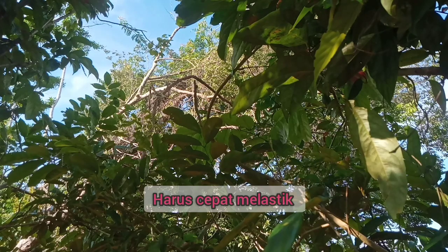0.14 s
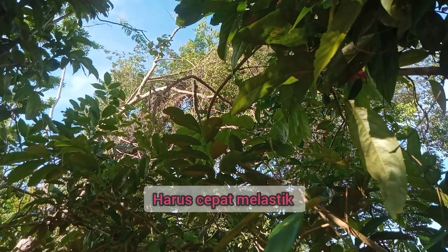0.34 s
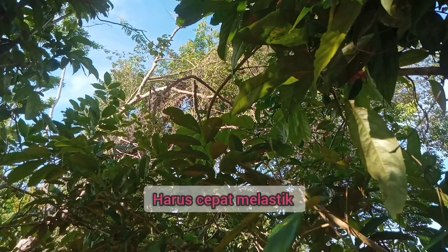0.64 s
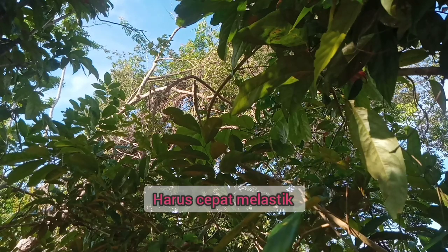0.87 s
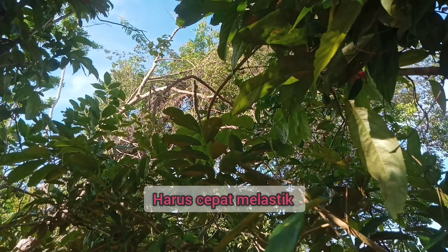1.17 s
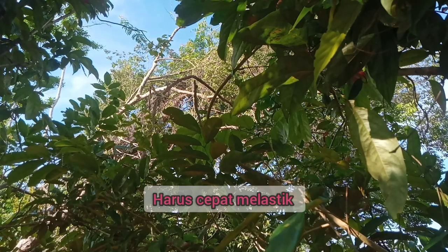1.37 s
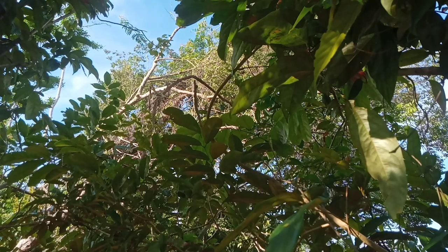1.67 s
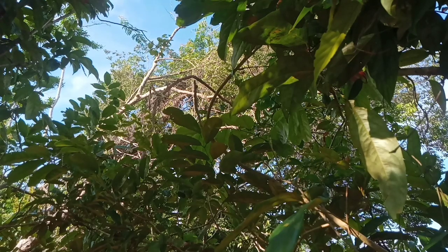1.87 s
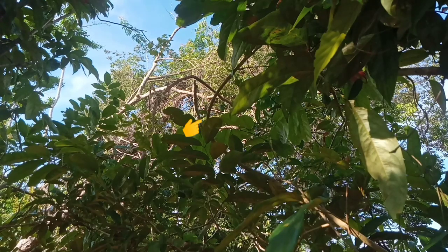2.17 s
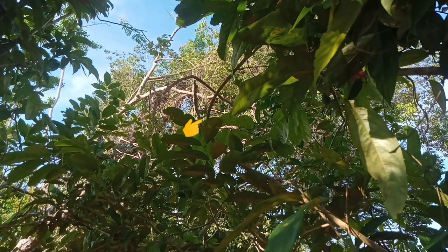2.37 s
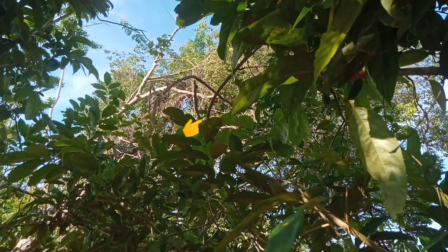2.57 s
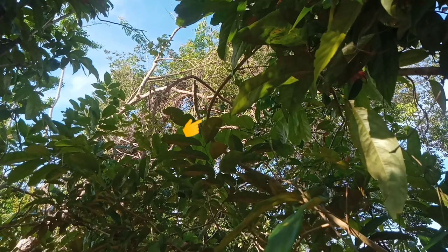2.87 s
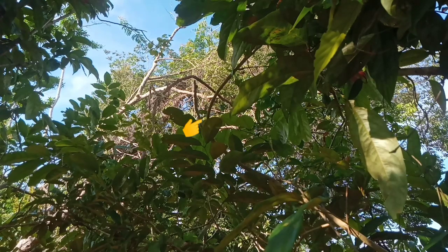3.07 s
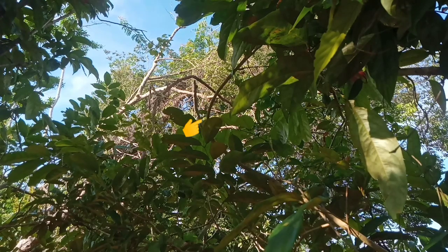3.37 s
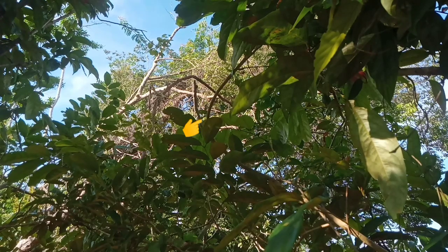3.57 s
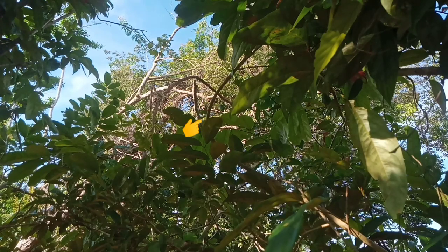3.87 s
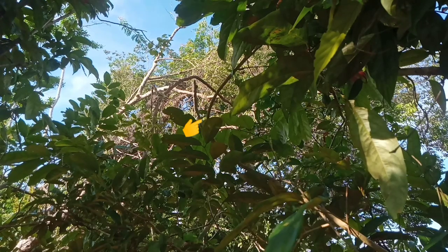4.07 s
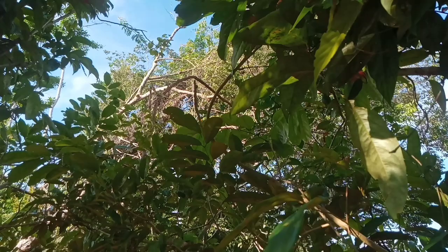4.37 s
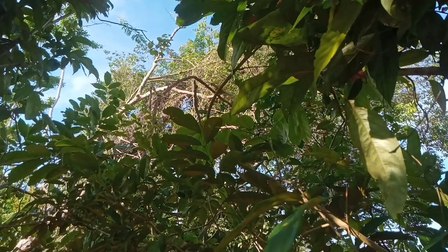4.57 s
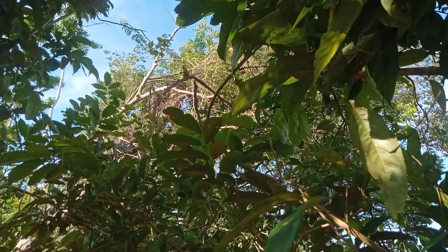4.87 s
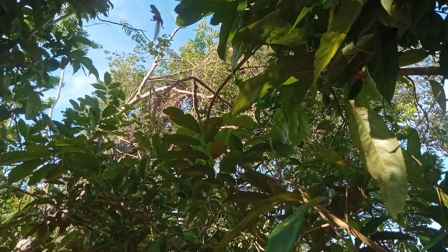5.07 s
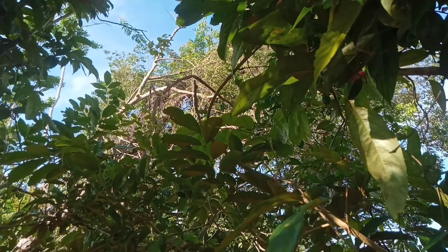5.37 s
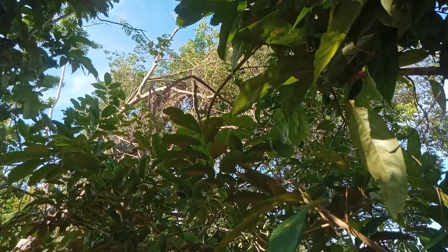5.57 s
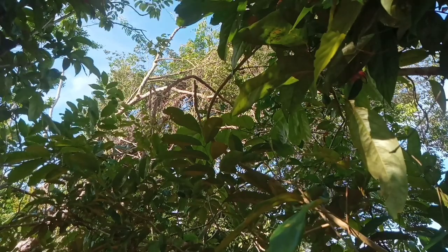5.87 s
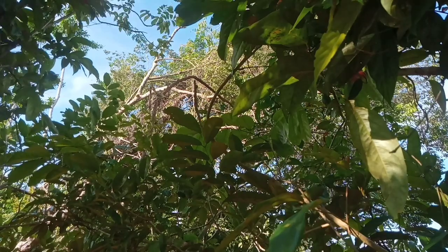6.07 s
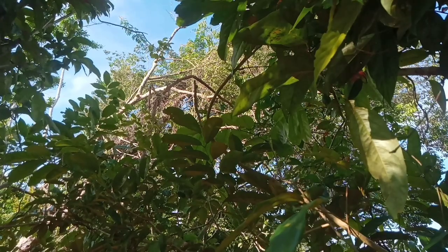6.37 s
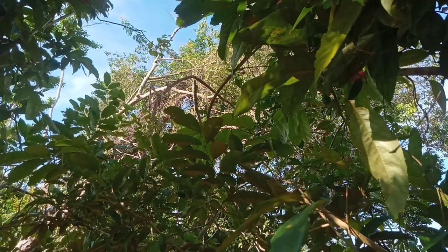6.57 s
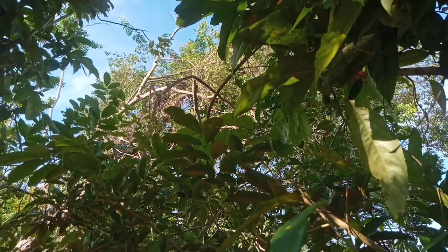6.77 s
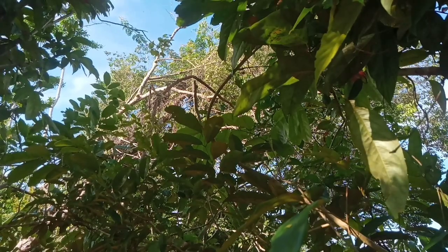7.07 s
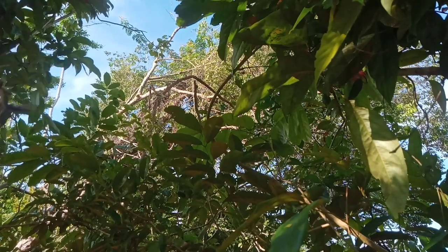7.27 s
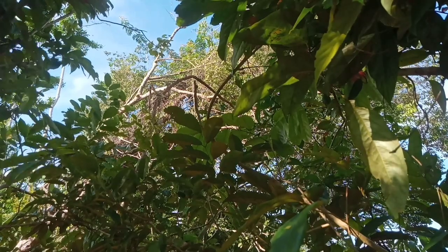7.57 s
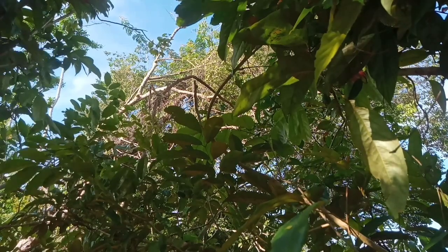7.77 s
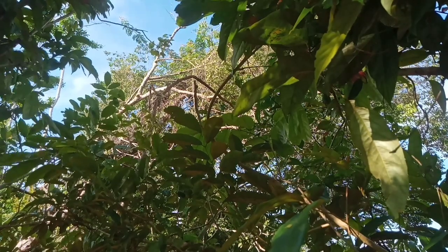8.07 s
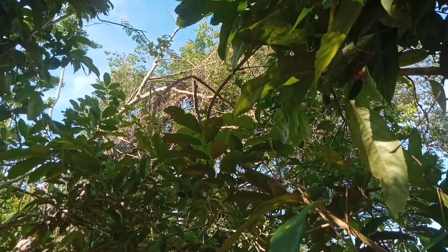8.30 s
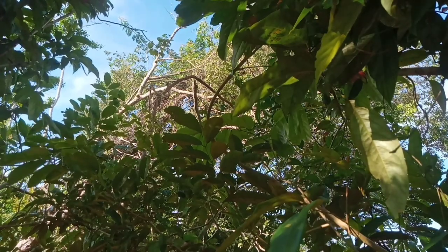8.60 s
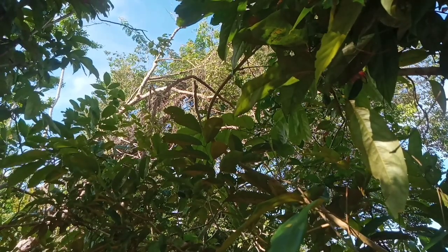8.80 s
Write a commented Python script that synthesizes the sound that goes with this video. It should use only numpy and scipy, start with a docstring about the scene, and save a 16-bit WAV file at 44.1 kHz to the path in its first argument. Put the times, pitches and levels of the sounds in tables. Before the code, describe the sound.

Soft bird chirps, a flutter of wings and steady insects, then a loud slingshot crack followed by knocks and rustling foliage.

```python
"""Slingshot in a forest.

Rubber bands crack and whip the air; the shot knocks on wood and twigs and shakes the leaves.
Before it a near bird calls five notes, far birds answer, a bird claps its wings, leaves stir.
Behind: a cicada clicking its drum, crickets, a thin insect whine, quiet air, light wind on the mic."""
import sys
import numpy as np
from scipy import signal
from scipy.io import wavfile
from scipy.ndimage import uniform_filter1d, map_coordinates

SR = 44100
rng = np.random.default_rng(int(sys.argv[2]) if len(sys.argv) > 2 else 0)


def inscribe(sig):
    """Save sig as 16-bit PCM at rate SR to the path in sys.argv[1].

    A 1-D sig is mono; a 2-D sig holds one channel per row.
    Samples are clipped to [-1, 1] before scaling.
    """
    pcm = np.round(np.clip(np.atleast_2d(sig).T, -1, 1) * 32767)
    wavfile.write(sys.argv[1], SR, pcm.astype(np.int16))


N = 394254

# spectra: f/Hz, relative density/dB
AIR_SPECTRUM = [(150, -5), (400, 2.5), (900, -3.5), (1300, -1), (2500, 2), (3400, 1), (4300, -7),
                (4900, -7.5), (5900, -18), (7000, -3.5), (9000, -9.5), (10000, -27), (15450, -14.5),
                (15550, -32.5)]
WIND_SPECTRUM = [(20, -48), (48, -22), (95, 1), (170, -5.5), (300, -16), (900, -71)]
LEAF_SPECTRUM = [(40, -31), (150, -6), (400, -2), (900, -2.5), (1500, -2), (2800, 1), (3800, -2),
                 (4600, -12), (5600, -21), (9000, -32), (15600, -48)]
SWISH_SPECTRUM = [(3000, -26.5), (6000, 8.5), (9000, -5), (15500, -5.5)]
SNAP_SPECTRUM = [(40, -20.5), (129, -8), (208, -22), (429, -0.5), (550, -5.5), (1350, 2.5), (1820, 0.5),
                 (3400, 3.5), (5470, -22), (7950, -22), (15600, -87)]
# wind puffs: t/s, level over breeze/dB
WIND_PUFFS = [(.94, 8), (3.95, 9), (4.34, 6), (4.88, 9), (5.36, 13), (6.03, 8), (6.62, 7), (7.35, 12),
              (7.66, 12), (7.735, 20), (8.15, 17), (8.24, 12), (8.76, 11)]

# insect whine: t/s, f/Hz, level/dB
WHINE_TRACK = [(0, 11430, -88), (.8, 11300, -93), (2.9, 11300, -102), (3.6, 11730, -87), (4.6, 11650, -82),
               (5.5, 11550, -84), (6.6, 11320, -86), (7.1, 11500, -83.5), (7.5, 11530, -91),
               (8.94, 11470, -100)]
# far cricket chorus: t/s, f/Hz, level/dB
CHORUS_TRACK = [(0, 2853, -70), (3.4, 2864, -69.5), (4.2, 2930, -66.5), (8.94, 2892, -69.5)]
# cicada drum modes: f/Hz, nominal width/Hz, level/dB
DRUM_MODES = [(7467, 94, -65.5), (8060, 140, -71.5), (15830, 460, -83.5)]
# click cycle, one row a mode: 8 x level/dB
DRUM_CLICKS_DB = [(-12, -5, -12, 0, -8, 0, -10, -8), (-4, -8, 0, -4, 0, -5, -2, -8),
                  (-9, -9, -6, 0, -2, -1, -2, -9)]

# far bird, rising whistles: t/s, end f/Hz, level/dB
FAR_RISES = [(4.501, 4630, -62), (4.685, 4500, -57), (4.859, 4150, -54), (5.039, 4200, -54),
             (5.565, 3640, -56.5), (5.775, 3670, -56), (5.959, 3700, -60), (6.147, 3470, -58.5),
             (6.379, 3470, -56.5)]
# second far bird, falling chirps: t/s, length/s, start f/Hz, level/dB
FAR_FALLS = [(1.812, 0.1, 3580, -59), (1.896, 0.04, 2660, -66), (2.206, 0.049, 3240, -58.5),
             (2.322, 0.012, 2760, -52.5), (3.286, 0.034, 2560, -59.5)]
# steady whistles: t/s, length/s, level/dB
STEADY_WHISTLES = [(3.3, .07, -59), (5.197, .055, -54)]
# near bird, falling notes: t/s, length/s, shelf f/Hz, sag/(Hz/s), level/dB
NEAR_FALLS = [(1.559, 0.085, 2120, 8600, -50), (1.866, .074, 1798, 900, -49.5),
              (2.165, 0.084, 1846, 3550, -51)]
# near bird, low notes: t/s, level/dB
NEAR_SCOOPS = [(1.744, -50.5), (2.045, -50.5)]
# wing claps: t/s, level/dB
WING_CLAPS = [(3.581, -42), (3.601, -40.5), (3.625, -33.5), (3.658, -30), (3.696, -25.5), (3.725, -37.5),
              (3.764, -34.5)]

# rustling, one table a spell: t/s, level/dB
RUSTLE_SPELLS = [
    [(3.575, -64), (3.72, -52), (3.82, -62.5), (3.9, -59), (4.3, -68.5), (5.238, -71)],
    [(5.238, -56), (5.32, -52), (5.56, -55.5), (5.85, -57), (6.12, -60), (6.4, -63), (6.48, -61),
     (6.555, -52)],
    [(6.78, -34), (6.96, -51.5), (7.16, -56.5), (7.22, -50), (7.45, -63), (7.62, -52.5), (7.9, -55.5),
     (8.02, -52.5), (8.22, -60.5), (8.32, -58.5), (8.94, -66.5)],
]
# drop of the low cut-off edge with loudness, one a spell: slope/(oct/dB)
EDGE_OCT_PER_DB = [.105, .155, .26]
# blows on twigs and leaves: t/s, level/dB, relative treble/dB, t60/s
TWIG_KNOCKS = [(3.948, -41, -17, 0.17), (4.255, -49.5, 11, 0.042), (4.718, -50, 4, .02),
               (5.007, -44, 0, 0.022), (5.271, -45.5, 16, 0.05), (5.331, -44, 2, 0.022),
               (5.419, -42, 5, 0.015), (5.5, -41.5, -7, 0.022), (5.933, -37.5, 3, 0.015),
               (6.476, -44, -5, 0.066), (7.135, -40.5, 12, 0.022), (7.218, -34, 7, 0.11),
               (7.235, -34, 9, 0.054), (7.255, -25.5, 7, 0.019), (7.288, -35, 4, 0.1), (7.34, -27, 3, 0.04),
               (7.351, -31.5, 13, 0.077), (7.386, -38, 8, .1), (7.472, -41, -7, 0.054),
               (7.566, -37, -8, 0.079), (7.631, -29.5, -16, 0.042), (7.696, -19, -17, 0.057),
               (7.704, -17, -23, 0.081), (7.712, -23, -6, 0.093), (7.753, -25, -20, 0.035),
               (7.939, -32, -12, 0.069), (8.004, -37, 5, 0.093), (8.111, -34.5, -19, 0.063),
               (8.13, -31.5, -17, 0.14), (8.147, -33.5, -11, 0.082), (8.163, -29, -5, 0.066),
               (8.639, -49, 4, 0.033)]

# bands letting go, then slapping back: start t/s, peak t/s, level/dB, t60/s
BAND_SWELLS = [(6.774, 6.806, -18, 0.021), (6.806, 6.822, -14, .08)]
# band cracks: t/s, level/dB
BAND_CRACKS = [(6.789, -5), (6.796, -4), (6.801, -9.5), (6.8135, -15.5), (6.8166, -9.5), (6.8192, 2),
               (6.823, -6), (6.833, -2), (6.875, -7.5), (6.8782, -15.5)]
# rubber whipping the air: t/s, level/dB, t60/s
BAND_SWISHES = [(6.781, -47, 0.15), (6.812, -32, 0.13), (6.83, -32.5, 0.18)]
# pouch and frame, then the shot on wood: t/s, level/dB, t60/s
DULL_THUMPS = [(6.792, -12, 0.042), (6.797, -1, 0.019), (6.821, -17.5, 0.013), (7.704, -16.5, 0.042)]


def gain_of(db):
    return 10 ** (np.asarray(db) / 20)


def unit_rms(x):
    return x / np.sqrt(np.mean(x ** 2) + 1e-20)


def spectrum_db(spectrum, hz):
    f, db = np.transpose(spectrum)
    return np.interp(np.log(hz + 1), np.log(f + 1), db)


def add(mix, start_s, sound):
    part = mix[round(start_s * SR):][:len(sound)]
    part += sound[:len(part)]


def drift(rate_hz):
    """Smooth random curve, rms 1."""
    knots = rng.standard_normal(int(N / SR * rate_hz) + 3)
    return unit_rms(map_coordinates(knots, [np.arange(N) / SR * rate_hz], order=3))


def resonate(x, hz, *widths_hz):
    """Resonators in series, one a width; hz may glide. Output rms 1."""
    carrier = np.exp(2j * np.pi * np.cumsum(hz * np.ones(len(x))) / SR)
    for width_hz in widths_hz:
        pole = np.exp(-np.pi * width_hz / SR)
        x = 2 * (carrier * signal.lfilter([1 - pole], [1, -pole], x / carrier + 1e-18)).real
    return unit_rms(x)


def colour(x, spectrum):
    """Minimum-phase filter, energy 1."""
    hz = abs(np.fft.fftfreq(8192, 1 / SR))
    log_gain = np.log(gain_of(spectrum_db(spectrum, hz).clip(-100)))
    taps = np.fft.ifft(np.exp(np.conj(signal.hilbert(log_gain)))).real[:3000]
    return signal.oaconvolve(x, taps / np.linalg.norm(taps))[:N]


def forest_tail(x, t60_s):
    """Diffuse scatter from trunks and leaves."""
    t = np.arange(SR // 2) / SR
    tail = rng.standard_normal(len(t)) * gain_of(-60 * t / t60_s) * np.minimum(t / 0.03, 1)
    return signal.oaconvolve(x, tail / np.linalg.norm(tail))[:N]


def patchy_noise(spectrum, patch_db):
    """Noise with drifting patches of level, rms 1."""
    frames, hz = N // 256 + 5, np.fft.rfftfreq(1024, 1 / SR)
    real, imag, patches = rng.standard_normal((frames, 513, 3)).T
    patches = unit_rms(uniform_filter1d(uniform_filter1d(patches, 10, 0), 10, 1))
    bins = (real + 1j * imag) * gain_of(spectrum_db(spectrum, hz)[:, None] + patch_db * patches)
    return unit_rms(signal.istft(bins, nperseg=1024, noverlap=768)[1][:N])


def blows(rows, grain_db, rise_s=0.00025):
    """Dying bursts of uneven grains. Rows: t/s, level/dB, t60/s."""
    t, out = np.arange(6000) / SR, np.zeros(N)
    noises, sizes = rng.standard_normal((len(rows), 6000)), rng.exponential(1, (len(rows), 6000))
    for (s, db, t60_s), noise, size, rise in zip(rows, noises, sizes, rise_s * np.ones(len(rows))):
        burst = unit_rms(noise * gain_of(grain_db * np.minimum(size, 4)))
        burst[40] += 3.5  # contact tick
        add(out, s, .5 * gain_of(db - 60 * t / t60_s) * np.minimum(t / rise, 1) * burst)
    return out


def air():
    """Faint hiss of the still forest."""
    return gain_of(-71.5) * patchy_noise(AIR_SPECTRUM, patch_db=3.0)


def wind(level_db=-76, puff_s=.05):
    """Rumble on the mic: uneven breeze, short puffs."""
    t = np.arange(N) / SR
    gusts_db = 3.5 * drift(12) + 1.5 * drift(3)
    gusts_db += sum(db * np.exp(-((t - s) / puff_s) ** 2) for s, db in WIND_PUFFS)
    return gain_of(level_db + gusts_db) * patchy_noise(WIND_SPECTRUM, patch_db=1.0)


def insect_whine(wingbeat_hz=320):
    """Narrow fluttering line, sidebands from the wing beat."""
    t = np.arange(N) / SR
    s, hz, db = np.transpose(WHINE_TRACK)
    line = resonate(rng.standard_normal(N), np.interp(t, s, hz), 60, 120)
    return gain_of(np.interp(t, s, db)) * line * (1 + 0.43 * np.cos(2 * np.pi * wingbeat_hz * t))


def crickets(faint_hz=3850, chirp_hz=5160, chirps_per_s=6.57):
    """Two far choruses merge into narrow hiss; one cricket chirps in time."""
    t, out = np.arange(N) / SR, np.zeros(N)
    s, track_hz, track_db = np.transpose(CHORUS_TRACK)
    main = (np.interp(t, s, track_hz), 110, np.interp(t, s, track_db))
    for hz, width_hz, db in [main, (faint_hz, 220, -84)]:
        chorus = resonate(rng.standard_normal(N), hz, width_hz, 2 * width_hz)
        out += gain_of(db + 1.5 * drift(6)) * chorus
    gate = np.clip(.3 + np.cos(2 * np.pi * chirps_per_s * (t - .16)), 0, 1)
    return out + gain_of(-84) * gate * resonate(rng.standard_normal(N), chirp_hz, 280, 400)


def cicada(cycle_hz=22.37):
    """Eight uneven, jittered clicks a cycle ring the drum; noise blurs them."""
    count = np.floor(8 * cycle_hz * np.arange(N) / SR + .08).astype(int)
    onsets = np.flatnonzero(np.diff(count) > 0)
    out = np.zeros(N)
    for (hz, width_hz, db), pattern_db in zip(DRUM_MODES, DRUM_CLICKS_DB):
        clicks = np.zeros(N)
        jittered = (onsets + rng.integers(0, 12, len(onsets))).clip(max=N - 1)
        click_db = np.take(pattern_db, (count[onsets] + 1) % 8) + 1.5 * rng.standard_normal(len(onsets))
        clicks[jittered] = gain_of(click_db)
        drive = unit_rms(clicks) + 0.95 * rng.standard_normal(N)
        out += gain_of(db) * resonate(drive, hz, 2.4 * width_hz, 2.4 * width_hz)
    return signal.sosfilt(signal.butter(12, 15500, fs=SR, output="sos"), out)


def whistle(length_s, start_hz, hz_per_s, rasp_hz, fade_db=-5.5):
    """Fading glide of narrowband noise."""
    t = np.arange(0, length_s, 1 / SR)
    rasp = resonate(rng.standard_normal(8000)[:len(t)], start_hz + hz_per_s * t, rasp_hz, rasp_hz)
    return gain_of(fade_db * t / length_s) * rasp * signal.windows.tukey(len(t), .45)


def far_birds(rise_from_hz=2250, rise_hz_per_s=28000):
    """Raspy glides, heard mostly as scatter; nearer steady whistles, dry."""
    glides, steady = np.zeros(N), np.zeros(N)
    for s, end_hz, db in FAR_RISES:
        length_s = (end_hz - rise_from_hz) / rise_hz_per_s
        add(glides, s, gain_of(db) * whistle(length_s, rise_from_hz, rise_hz_per_s, rasp_hz=400))
    for s, length_s, start_hz, db in FAR_FALLS:
        add(glides, s, gain_of(db) * whistle(length_s, start_hz, hz_per_s=-15400, rasp_hz=385))
    for s, length_s, db in STEADY_WHISTLES:
        add(steady, s, gain_of(db) * whistle(length_s, start_hz=2370, hz_per_s=0, rasp_hz=39.7))
    return steady + glides + gain_of(3.5 + 1.2 * drift(60)) * forest_tail(glides, t60_s=.4)


def husky_note(hz, husk_db, attack_s=.006, release_s=.0048):
    """Sine glide with fast level flutter."""
    t = np.arange(len(hz)) / SR
    edges = np.minimum(t / attack_s, 1) * np.minimum((t[-1] - t) / release_s, 1)
    flutter = gain_of(husk_db * drift(249)[:len(t)])
    return np.sqrt(2) * edges * flutter * np.sin(2 * np.pi * np.cumsum(hz) / SR)


def near_bird(top_hz=2210, settle_s=.0108, end_hz=1300, drop_s=.0157, low_hz=1292, low_s=.048):
    """Three notes settle on a shelf and drop; two low scoops between."""
    out = np.zeros(N)
    for s, length_s, shelf_hz, sag_hz_per_s, db in NEAR_FALLS:
        t = np.arange(0, length_s, 1 / SR)
        hz = shelf_hz - sag_hz_per_s * t + (top_hz - shelf_hz) * np.exp(-t / settle_s)
        hz += (end_hz - hz[-1]) * np.clip(1 - (length_s - t) / drop_s, 0, 1)
        add(out, s, gain_of(db - 8 * t / length_s) * husky_note(hz, husk_db=4.5))
    for s, db in NEAR_SCOOPS:
        t = np.arange(0, low_s, 1 / SR)
        hz = low_hz + 110 * np.exp(-t / .0068) + 2940 * t  # dip, then climb
        add(out, s, gain_of(db - .5 * t / low_s) * husky_note(hz, husk_db=1.5))
    return out + gain_of(-8.5 + 1.7 * drift(50.26)) * forest_tail(out, t60_s=0.51)


def treble(x, cut_hz=5800):
    return signal.lfilter(*signal.butter(2, cut_hz, "highpass", fs=SR), x)


def wing_claps(t60_s=.064, rise_s=.0036, band_hz=(570, 4270), tip_db=-13, tip_t60_s=.02):
    """Take-off: midrange bursts, each with a bright tip."""
    claps = blows([(s, db, t60_s) for s, db in WING_CLAPS], grain_db=0.5, rise_s=rise_s)
    tips = blows([(s + rise_s / 2, db + tip_db, tip_t60_s) for s, db in WING_CLAPS], grain_db=2)
    return signal.lfilter(*signal.butter(3, band_hz, "bandpass", fs=SR), claps) + treble(tips)


def rustle(shake_db=-27.5, shake_t60_s=.31):
    """Clumped grains, in spells and as leaves shake on after each knock."""
    t, envelope = np.arange(N) / SR, np.zeros(N)
    for spell in RUSTLE_SPELLS:
        s, db = np.transpose(spell)
        gate = uniform_filter1d(1. * (t > s[0]) * (t < s[-1]), 100)
        envelope += gate * gain_of(np.interp(t, s, db))
    for s, db, *_ in TWIG_KNOCKS:
        add(envelope, s, gain_of(db + shake_db - 60 * t[:SR // 2] / shake_t60_s))
    noise = rng.standard_normal(N)
    grains_db = 2.8 * np.minimum(rng.exponential(1, N), 5) + 1.3 * drift(90)
    return envelope * unit_rms(noise * gain_of(grains_db))


def knocks():
    """Blows on twigs and leaves; longer ones start more softly."""
    s, db, treble_db, t60_s = np.transpose(TWIG_KNOCKS)
    rise_s = .5 * t60_s ** 2
    body = blows(list(zip(s, db, t60_s)), grain_db=2.5, rise_s=rise_s)
    crisp = blows(list(zip(s, db + treble_db, t60_s)), grain_db=4.0, rise_s=rise_s)
    return body + treble(crisp)


def low_edge_drop_oct(sound, rest_oct=.82, threshold_db=-59.5, smooth_s=.054, hold_s=.09):
    """The low edge slides down with loudness and jumps in random steps."""
    t, oct_per_db = np.arange(N) / SR, np.zeros(N)
    for spell, slope in zip(RUSTLE_SPELLS, EDGE_OCT_PER_DB):
        oct_per_db[t > spell[0][0]] = slope
    level_db = 10 * np.log10(abs(uniform_filter1d(sound ** 2, 400)) + 1e-8)
    level_db = uniform_filter1d(level_db, round(smooth_s * SR))
    steps_oct = .38 * drift(11)[(t // hold_s * hold_s * SR).astype(int)]
    return rest_oct + oct_per_db * np.maximum(level_db - threshold_db, 0) + steps_oct


def foliage(edge_ref_hz=2000, patch_db=3.4):
    """Rustle, claps and knocks, hollow and patchy; their low end is cut off below a sharp edge that slides
    lower as they grow louder."""
    t = np.arange(N) / SR
    sound = colour(rustle() + wing_claps() + knocks(), LEAF_SPECTRUM)
    hz, frame_s, bins = signal.stft(sound, SR, nperseg=512, noverlap=384)
    drop_oct = np.interp(frame_s, t, low_edge_drop_oct(sound))
    above_edge_oct = np.log2(hz[:, None] / edge_ref_hz + 1e-3) + drop_oct
    cut_db = -22 / (1 + np.exp(np.clip(above_edge_oct / .06, -50, 50)))
    peak_db = 5 * np.exp(-((above_edge_oct - .12) / .14) ** 2)
    patches = rng.standard_normal(bins.shape[::-1]).T
    patches = unit_rms(uniform_filter1d(uniform_filter1d(patches, 2, 0), 22, 1))
    bins *= gain_of(cut_db + peak_db + patch_db * patches)
    return signal.istft(bins, SR, nperseg=512, noverlap=384)[1][:N]


def slingshot(swell_rise_db=26, crack_t60_s=.02):
    """Bands crackle, crack and whip the air; pouch, frame and landing shot thump."""
    t, swells = np.arange(N) / SR, np.zeros(N)
    for start_s, peak_s, db, t60_s in BAND_SWELLS:
        rise_db = swell_rise_db * (t - peak_s) / (peak_s - start_s)
        decay_db = -60 * (t - peak_s) / t60_s
        swells += (t > start_s) * gain_of(db + np.minimum(rise_db, decay_db).clip(-200))
    crackle = unit_rms(rng.standard_normal(N) * gain_of(6 * np.minimum(rng.exponential(1, N), 4)))
    cracks = blows([(s, db, crack_t60_s) for s, db in BAND_CRACKS], grain_db=5.5)
    snap = colour(swells * crackle + cracks, SNAP_SPECTRUM)
    thumps = blows(DULL_THUMPS, grain_db=5.0)
    thumps = colour(thumps, spectrum=[(40, -29), (200, -4), (420, -4), (1000, -1.5), (3000, -45)])
    swish = colour(blows(BAND_SWISHES, grain_db=-1), SWISH_SPECTRUM)
    return snap + thumps + swish + gain_of(-18) * forest_tail(snap + thumps, t60_s=0.1)


def scene():
    """Mono mix."""
    background = air() + wind() + insect_whine() + crickets() + cicada()
    return (background + far_birds() + near_bird() + foliage() + slingshot())[None]


def record(dry, cutoff_hz=15720):
    """Soft overload on the snap, then band limit."""
    lowpass = signal.firwin(1023, cutoff_hz, window=("kaiser", 12), fs=SR)
    return signal.oaconvolve(np.tanh(dry), lowpass[None], "same")


dry = scene()
out = record(dry)
inscribe(out)
```